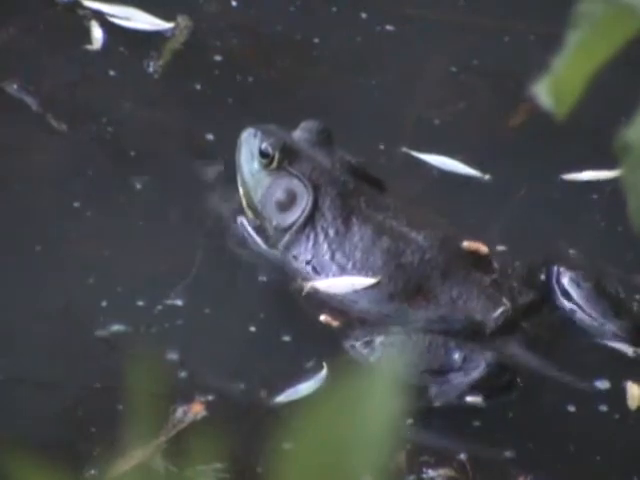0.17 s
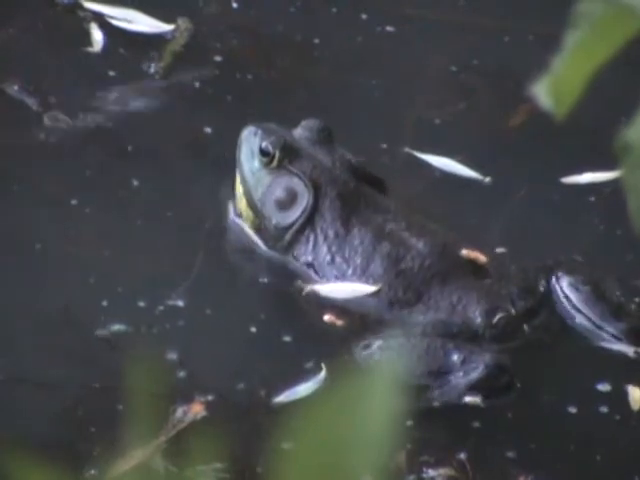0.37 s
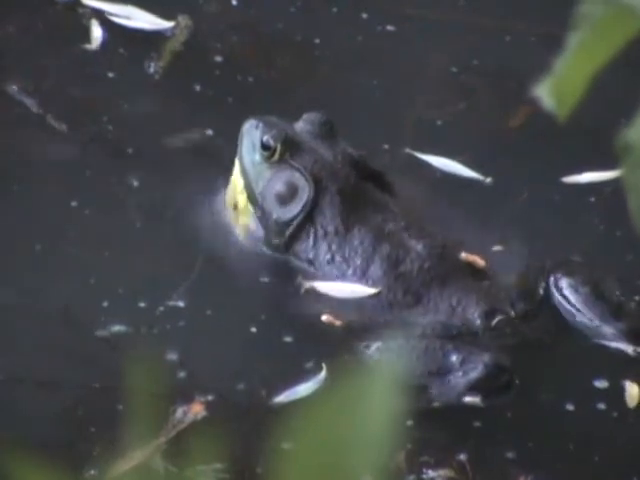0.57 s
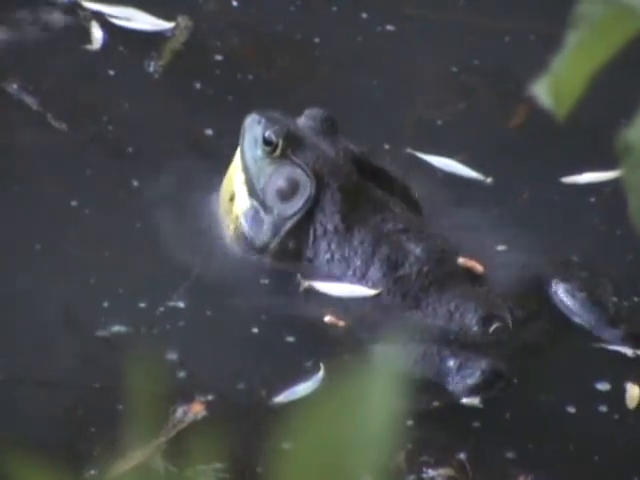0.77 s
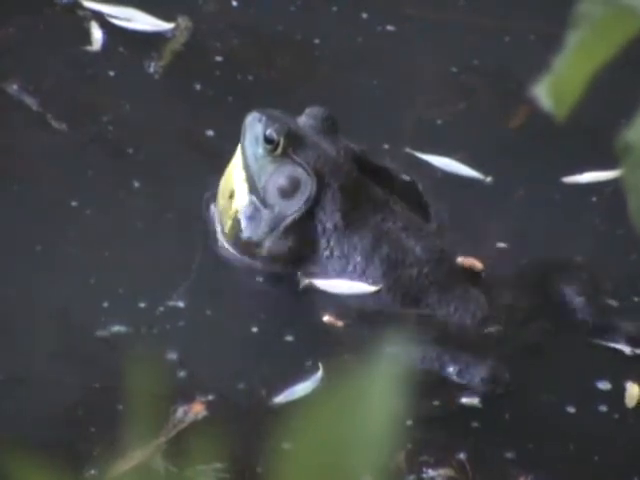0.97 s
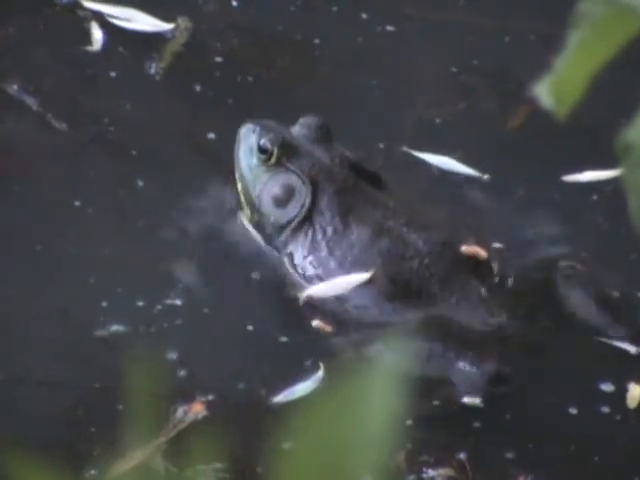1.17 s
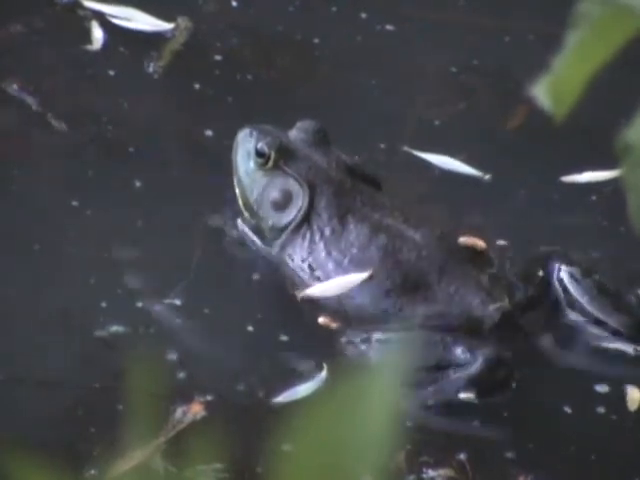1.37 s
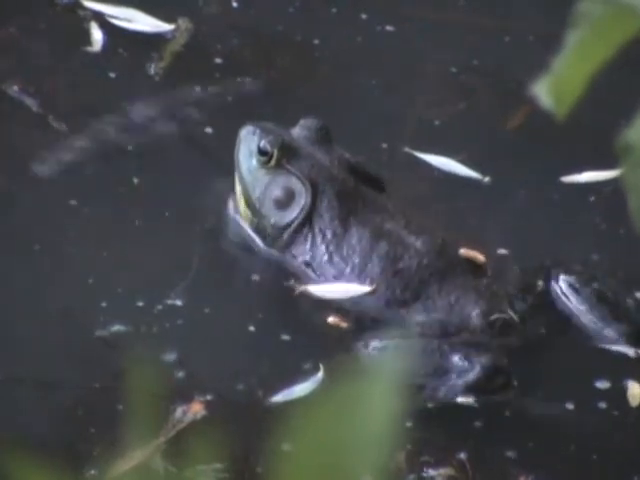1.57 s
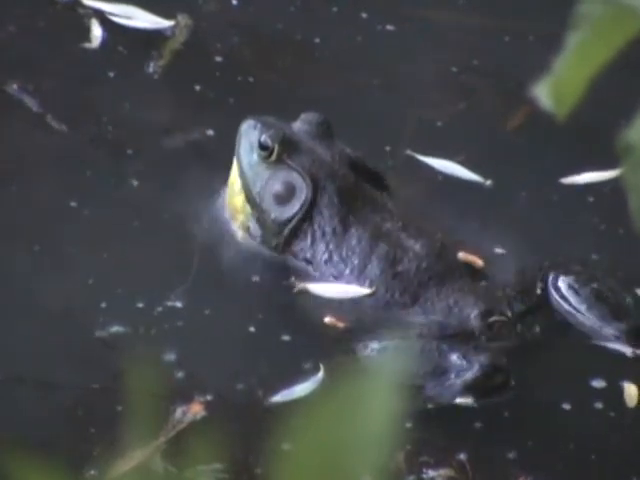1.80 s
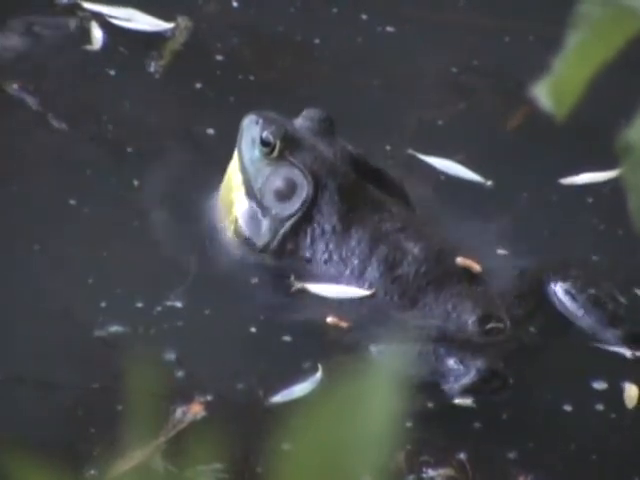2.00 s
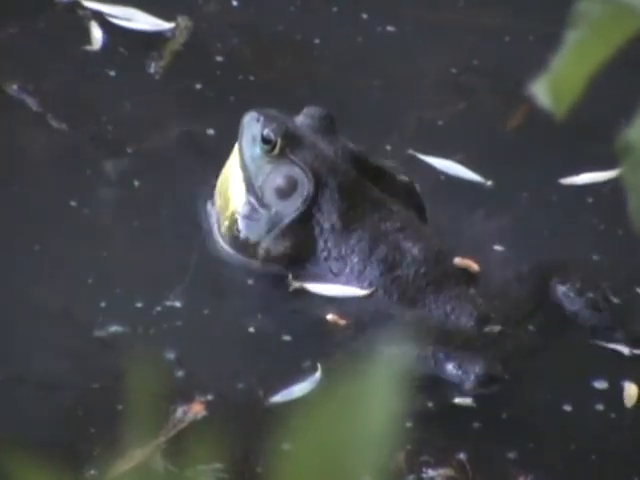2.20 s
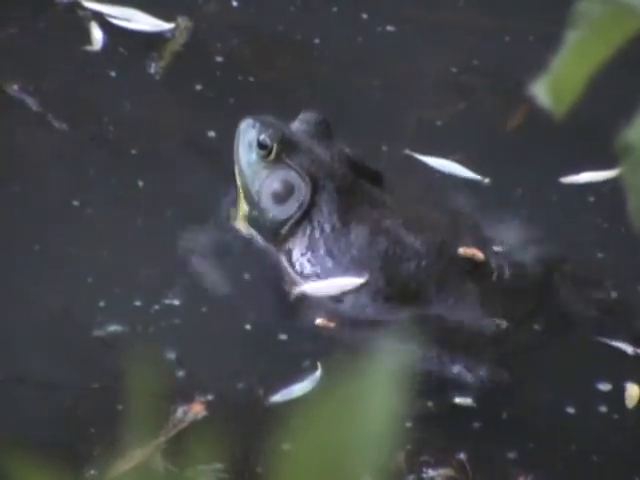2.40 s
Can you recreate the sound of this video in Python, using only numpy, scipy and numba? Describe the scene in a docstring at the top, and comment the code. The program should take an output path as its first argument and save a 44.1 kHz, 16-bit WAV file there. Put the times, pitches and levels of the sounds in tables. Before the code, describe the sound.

Two deep, buzzing bullfrog croaks swell and cut off over quiet water and low distant rumble

```python
"""In a still pond a bullfrog floats and bellows twice, a couple of metres from a small stereo camera.
Its vocal folds slap three times a cycle: the sac hums on the low overtones, and the slaps
excite higher resonances of the eardrums and head. The voice catches now and then, and thin whistles slide.
Water ticks as decaying sines, a far bird gives arched peeps, and shaped noise is the distant rumble and hiss."""
import sys
import numpy as np
from scipy import signal
from scipy.fft import rfft, irfft
from scipy.io import wavfile
from scipy.ndimage import uniform_filter1d
from numba import njit

SR = 44100
rng = np.random.default_rng(int(sys.argv[2]) if len(sys.argv) > 2 else 0)


def digitize_waveform(pressure):
    """Quantize a signal to 16-bit integers and store it at the path in sys.argv[1].

    Rows of a 2-D input are taken as channels; values are limited to [-1, 1].
    """
    field = np.atleast_2d(pressure).T
    bounded = np.clip(field, -1, 1)
    quanta = np.round(bounded * 32767).astype(np.int16)
    wavfile.write(sys.argv[1], SR, quanta)


def natural_amplitude(level_db):
    """Convert a level in decibels to a linear amplitude factor, elementwise."""
    exponent = np.asarray(level_db, float) / 20
    return 10 ** exponent


N = 108045

# Distant rumble and hiss. Each row: frequency in Hz, relative spectral density in dB per Hz.
AIR_SPECTRUM = [(15, -60), (25, -24), (59, -4), (91, -9), (126, -4.5), (260, -15), (305, -14.5),
                (378, -16.5), (582, -30), (631, -21.5), (1080, -25.5), (2630, -25.5), (2920, -29.5),
                (4620, -34), (15500, -46.5)]
# Likeness of the air noise on the two sides. Each row: frequency in Hz, shared part of the power from 0 to 1.
AIR_LIKENESS = [(60, 0.95), (130, 1), (290, 1), (640, 0.46), (1410, 0.34), (3100, 0.69), (6820, 0.48),
                (15000, 1)]
# Vocal-fold rate, one list per bellow. Each row: time in seconds, fold cycles per second.
FOLD_RATE = [
    [(0.05, 104.8), (0.1, 98.9), (0.116, 98.8), (0.442, 98.9), (0.478, 100.9), (0.576, 101.0),
     (0.654, 103.4), (0.782, 105.6), (0.882, 97.2), (0.95, 90.0)],
    [(1.32, 100.4), (1.352, 100.4), (1.398, 98.4), (1.588, 98.4), (1.626, 97.3), (1.664, 97.2),
     (1.706, 100.3), (1.796, 99.9), (1.832, 101.3), (2.08, 105.2), (2.14, 100.3), (2.23, 92.0)],
]
# Vocal effort, one list per bellow. Each row: time in seconds, sac hum in dB, slaps in dB.
EFFORT_CURVE = [
    [(0.04, -67, -82), (0.064, -42, -86), (0.07, -41, -61), (0.098, -45.5, -54.5), (0.286, -32, -32.5),
     (0.334, -34, -31), (0.384, -28.5, -29.5), (0.43, -25.5, -26.5), (0.458, -29, -29),
     (0.52, -24.5, -25.5), (0.792, -23, -26.5), (0.856, -26, -36.5), (0.896, -30, -40.5),
     (0.958, -48.5, -67), (0.97, -44, -58.5)],
    [(1.31, -61, -78.5), (1.32, -42, -80), (1.332, -42, -60), (1.362, -41, -59), (1.388, -44, -50),
     (1.532, -29.5, -31.5), (1.56, -33.5, -33.5), (1.646, -27, -26.5), (1.666, -27.5, -31.5),
     (1.68, -23.5, -23), (1.702, -27.5, -28.5), (1.742, -26, -24.5), (1.778, -23.5, -27), (1.816, -26, -26),
     (1.916, -22, -26), (1.94, -23.5, -26.5), (1.988, -24.5, -26), (2.09, -23, -27), (2.144, -28, -39),
     (2.176, -28.5, -40), (2.212, -40.5, -54), (2.25, -61, -71)],
]
# Catches of the voice. Each row: time in seconds, share of a cycle lost (negative: gained), dip of the hum in dB.
VOICE_CATCHES = [(.313, -.12, -7), (.453, .2, -8), (.591, .1, -6), (1.54, .2, -7), (1.68, .2, -6),
                 (1.708, .05, -4), (1.812, .15, -5), (1.936, .25, -9)]
# Sac overtones. Each row: multiple of the fold rate, level in dB at full effort, relative to the hum.
SAC_OVERTONES = [(1, -37.5), (2, 2.5), (3, 0.5), (4, -16), (5, -20.5), (6, -16.5), (7, -29), (8, -23)]
# A softer call is duller. Each row: frequency in Hz, dB lost per dB of lower effort (negative: gained).
SOFT_DULLING = [(200, 0), (300, .4), (420, .4), (500, 0), (600, .15), (800, .3), (900, -.1), (1200, -.3),
                (1700, .55), (3500, .55), (6000, .8), (10000, 1.6)]
# Slaps in a cycle. Each row: place as a share of the cycle, level in dB,
# dB gained per dB of lower effort, slope in dB per octave above 2 kHz.
FOLD_SLAPS = [(0, 0, 0, 0), (.353, -7, .15, -14), (.706, -6, .2, -4)]
# Eardrum and head resonances. Each row: centre in Hz, spread in Hz, rms level in dB at full effort.
HEAD_RESONANCES = [(913, 92, -11.5), (1182, 65, -5.5), (1667, 302, 1), (2390, 330, -14), (3050, 146, -19),
                   (3547, 352, -19), (4840, 300, -31.5), (5830, 800, -32.5), (7240, 1300, -40),
                   (10000, 1300, -44)]
# Thin whistles, most falling as the sac fills. Each row: start in seconds, end in seconds,
# first frequency in Hz, last frequency in Hz, rms level in dB before the fades.
WHISTLE_GLIDES = [(0.169, 0.218, 3200, 4300, -57.5), (0.222, 0.31, 5170, 4260, -60),
                  (.29, 0.467, 4300, 3990, -56.5), (.38, 0.543, 5020, 4530, -61.5),
                  (0.442, 0.61, 5680, 4920, -51.5), (0.602, 0.826, 4880, 4560, -44.5),
                  (0.845, 0.897, 4570, 4270, -63), (.47, 0.594, 3540, 3070, -43),
                  (0.563, .7, 6000, 5650, -59), (0.72, 0.846, 5880, 5550, -52),
                  (1.499, 1.69, 4350, 4100, -60), (1.59, 1.766, 4840, 4650, -58),
                  (1.636, 1.813, 6050, 4900, -56), (1.826, 1.949, 4980, 4880, -48.5),
                  (1.956, 2.104, 4837, 4550, -42.5), (1.856, 2.138, 6050, 5360, -55)]
# Water ticks. Each row: start in seconds, level in dB, ring in Hz, 60 dB decay time in seconds.
WATER_TICKS = [(1.104, -51, 9418, 0.013), (1.123, -46, 4540, 0.016), (1.131, -50, 4870, 0.0156),
               (1.316, -52, 7400, .015), (1.333, -32.5, 3050, 0.012), (1.335, -36, 1240, 0.0165),
               (1.334, -42.5, 4200, .015), (1.336, -51, 8236, .012), (1.352, -52, 3050, .015),
               (1.394, -47, 4260, .015), (1.399, -47, 6100, 0.018), (1.4, -46, 8300, .012),
               (1.4, -55, 10800, 0.011)]
# Peeps of the far bird. Each row: middle in seconds, peak level in dB.
BIRD_PEEPS = [(2.23, -63), (2.335, -58), (2.44, -57)]
# Phase between the microphone ports. Each row: frequency in Hz, lead of the left port in radians.
PORT_PHASE = [(0, 0), (260, 0.83), (600, 1.39), (3190, 0.38), (3700, 0.62), (4910, 0.34), (5340, 0.53),
              (8350, -0.0), (15400, 0.0)]
# Level between the microphone ports. Each row: frequency in Hz, left minus right in dB.
PORT_BALANCE = [(60, 5), (110, -1), (200, 3.0), (380, 1.5), (700, 2.0), (1290, 2.5), (2380, 1.5),
                (4400, 1.5), (8120, 1), (15000, -0.5)]

FULL_DB, SILENT_DB = -24, -66  # no dulling above the first; the voice is silent below the second


def on_log(table, hz):
    """Interpolation: a (Hz, value) table read on a logarithmic frequency axis."""
    rows = np.array(table, float)
    return np.interp(np.log(np.maximum(hz, 1)), np.log(np.maximum(rows[:, 0], 15)), rows[:, 1])


def joined(tables, t, axis):
    """Interpolation: one column of both bellows as a continuous curve in time."""
    rows = np.vstack(tables)
    return np.interp(t, rows[:, 0], rows[:, axis])


@njit
def svf(x, hz, width):
    """Resonance: a state-variable band-pass of gain 1 whose centre may move."""
    y, b, l = np.empty(len(x)), 0., 0.
    for i in range(len(x)):
        g, k = np.tan(np.pi * hz[i] / SR), width / hz[i]
        v = (b + g * (x[i] - l)) / (1 + g * (g + k))
        b, l, y[i] = 2 * v - b, l + 2 * g * v, k * v
    return y


def unit(x):
    """Normalisation: scale to rms 1."""
    return x / np.sqrt(np.mean(x ** 2))


def walk(rate):
    """Random fluctuation: held values, drawn rate times a second and smoothed twice, spread near 1."""
    k = int(SR / rate)
    held = np.repeat(rng.standard_normal(N // k + 1), k)
    return 1.3 * uniform_filter1d(uniform_filter1d(held, k), k)[:N]


def air(hz):
    """Partial coherence: rumble and hiss mix noise common to both sides with noise of each side's own."""
    common_db = -47.5  # rms of the common noise
    alike = np.clip(on_log(AIR_LIKENESS, hz), 0, 1)
    shape = natural_amplitude(on_log(AIR_SPECTRUM, hz))
    common, left, right = (rfft(rng.standard_normal(N) * natural_amplitude(1.5 * walk(6.77))) * shape for _ in range(3))
    gain = natural_amplitude(common_db) / np.sqrt(np.mean(irfft(common, N) ** 2))
    return gain * (np.sqrt(alike) * common + np.sqrt(1 - alike) * np.array([left, right]))


def sac(cycles, hum_db):
    """Harmonic radiation: low overtones grow with effort, the higher ones waver, and airflow noise joins."""
    lag = .18  # share of a cycle after the first slap
    waver_db, alternate, breath_db = .7, .08, -21  # waver per multiple; strong-weak share; airflow noise
    soft = np.maximum(FULL_DB - hum_db, 0)
    tone = np.zeros(N)
    for k, db in SAC_OVERTONES:
        level_db = db - on_log(SOFT_DULLING, 100 * k) * soft + waver_db * (k - 1.36) * walk(21.4)
        tone += natural_amplitude(level_db) * np.cos(2 * np.pi * k * (cycles - lag))
    centre = np.full(N, 450.)
    breath = unit(svf(svf(rng.standard_normal(N), centre, 540.0), centre, 600.))
    strong_weak = 1 + alternate * np.cos(np.pi * cycles)
    return natural_amplitude(hum_db) * (tone * strong_weak + natural_amplitude(breath_db) * breath)


def slaps(t, cycles, caught, soft):
    """Impulsive excitation: three click trains, strong and weak cycles in turn, ragged at the catches."""
    jitter, catch_jitter = .008, 0.0771  # shares of a cycle
    scatter_db, alternate_db = .9, 1.
    turn = np.arange(int(cycles[-1]))
    out = np.zeros((len(FOLD_SLAPS), N + 2))
    for row, (share, db, even, _) in zip(out, FOLD_SLAPS):
        chance = rng.standard_normal((2, len(turn)))
        when = np.interp(turn + share, cycles, t)
        spread = jitter + catch_jitter * np.interp(when, t, caught)
        at = np.clip(np.interp(turn + share + spread * chance[0], cycles, t) * SR, 0, N)
        slap_db = np.minimum(db + even * np.interp(when, t, soft), 0)
        size = natural_amplitude(slap_db + scatter_db * chance[1] + alternate_db * (-1) ** turn)
        # a click between two samples is shared by both
        np.add.at(row, at.astype(int), size * (1 - at % 1))
        np.add.at(row, at.astype(int) + 1, size * (at % 1))
    return out[:, :N] / np.sqrt(np.mean(out.sum(axis=0) ** 2))


def burst(spectrum, hz, spread):
    """Zero-phase resonance: a bell-shaped band swells and fades evenly around each click."""
    bell = np.exp(-.5 * ((np.fft.rfftfreq(N, 1 / SR) - hz) / spread) ** 2)
    return unit(irfft(spectrum * bell, N))


def head(clicks, rasp, soft):
    """Modal excitation: slaps and rasp ring the resonances; higher up, later slaps dull and rasp gains."""
    rasp_db, rasp_slope = -14, 8  # slope in dB per octave above 2 kHz
    out, slap_slope = 0, np.array(FOLD_SLAPS)[:, 3]
    for hz, spread, db in HEAD_RESONANCES:
        octaves = max(np.log2(hz / 2000), 0)
        drive = natural_amplitude(slap_slope * octaves) @ clicks + natural_amplitude(rasp_db + rasp_slope * octaves) * rasp
        out = out + natural_amplitude(db - on_log(SOFT_DULLING, hz) * soft) * burst(drive, hz, spread)
    return out


def whistles(t, cycles):
    """Filtered noise: gliding narrow resonances make breathy tones that throb with the fold cycle."""
    fade = .6  # share of a cycle
    out = np.zeros(N)
    cycle_gain = natural_amplitude(2 * rng.standard_normal(400))
    throb = np.exp(-(cycles % 1) / fade) * cycle_gain[cycles.astype(int)]
    for t0, t1, hz0, hz1, db in WHISTLE_GLIDES:
        s = slice(int(t0 * SR), int(t1 * SR))
        u = (t[s] - t0) / (t1 - t0)
        hz = hz0 + (hz1 - hz0) * u
        noise = rng.standard_normal(N)[s] * throb[s]
        tone = svf(svf(noise, hz, 110.0), hz, 990.0)  # widths in Hz
        out[s] += natural_amplitude(db) * unit(tone) * np.clip(np.sin(np.pi * u), 0, 1) ** 0.19
    return out


def frog(t):
    """Source and resonator: one fold phase drives the hum, the ringing slaps with rasp, and the whistles."""
    catch_s, falter_db = 0.0209, -3  # length of a phase slip; slaps weaken just after a catch
    cycles = np.cumsum(joined(FOLD_RATE, t, axis=1) * (1 + 0.0037 * walk(25))) / SR
    cycles = cycles - sum(lost * np.clip((t - at) / catch_s + .5, 0, 1) for at, lost, _ in VOICE_CATCHES)
    caught = sum(np.exp(-((t - at - .01) / 0.0207) ** 2) for at, _, _ in VOICE_CATCHES)
    dip_db = sum(db * np.exp(-((t - at) / 0.0092) ** 2) for at, _, db in VOICE_CATCHES)
    hum_db, slap_db = joined(EFFORT_CURVE, t, axis=1), joined(EFFORT_CURVE, t, axis=2)
    soft = np.maximum(FULL_DB - slap_db, 0)
    rasp = rng.standard_normal(N) * np.exp(-(3 * cycles % 1) / .5)  # three puffs a cycle
    rings = head(rfft(slaps(t, cycles, caught, soft)), rfft(rasp), soft)
    voiced = np.clip((slap_db - SILENT_DB) / 10, 0, 1)
    hum = natural_amplitude(dip_db) * sac(cycles, hum_db)
    ringing = natural_amplitude(slap_db + falter_db * caught) * rings
    return voiced * (hum + ringing) + whistles(t, cycles)


def water_ticks(t):
    """Damped oscillation: each tick is a sine with a half-millisecond rise and an exponential decay."""
    out = np.zeros(N)
    for at, db, hz, t60 in WATER_TICKS:
        u = np.maximum(t - at, 0)
        out += natural_amplitude(db) * (1 - np.exp(-u / 0.0005)) * np.sin(2 * np.pi * hz * u) * 1000. ** (-u / t60)
    return out


def far_bird(t):
    """Frequency modulation: each peep arches in pitch and swells and fades as a parabola."""
    length_s, top_hz, drop_hz = .065, 2700, 500
    out = np.zeros(N)
    for at, db in BIRD_PEEPS:
        u = np.clip((t - at) / length_s * 2, -1, 1)
        phase = 2 * np.pi * np.cumsum(top_hz - drop_hz * u ** 2) / SR
        out += natural_amplitude(db) * (1 - u ** 2) * np.sin(phase)
    return out


def bank_echo(near, t):
    """Diffuse reverberation: convolution with decaying noise, independent on the two sides."""
    echo_db, t60_s = -18, .35
    tails = rng.standard_normal((2, SR // 2)) * 1000. ** (-t[:SR // 2] / t60_s)
    echo = np.array([signal.fftconvolve(near, h / np.sqrt(np.sum(h ** 2)))[:N] for h in tails])
    return natural_amplitude(echo_db) * echo


def scene():
    """Superposition: near sounds, bank echo and air add, then differ in phase and level at two ports."""
    t, hz = np.arange(N) / SR, np.fft.rfftfreq(N, 1 / SR)
    near = frog(t) + water_ticks(t) + far_bird(t)
    lead = on_log(PORT_PHASE, hz)
    port = natural_amplitude(on_log(PORT_BALANCE, hz) / 2) * np.exp(.5j * lead)
    # the cosine makes up what the phase lead takes from the sum of the two sides
    both = rfft(near) / np.cos(lead / 2) + rfft(bank_echo(near, t)) + air(hz)
    return irfft(both * np.array([port, 1 / port]), N)


def band_limit(x):
    """A steep low-pass at the top of the band."""
    return signal.sosfilt(signal.butter(12, 15850, fs=SR, output="sos"), x)


def record(dry):
    """Signal chain: the finished stereo mix passes through the camera."""
    return band_limit(dry)


dry = scene()
out = record(dry)
digitize_waveform(out)
```